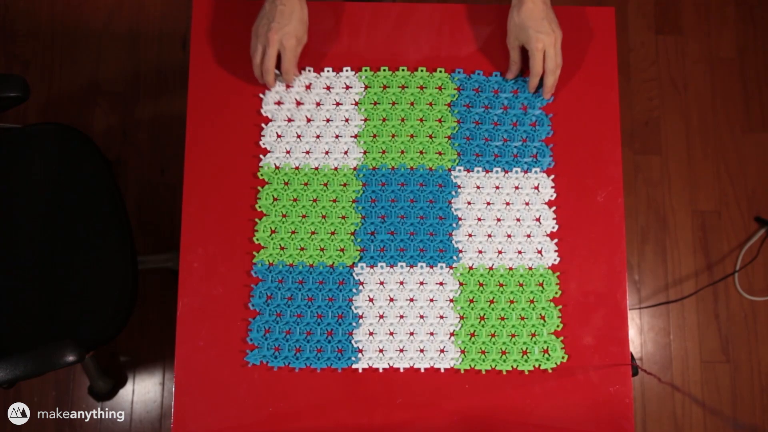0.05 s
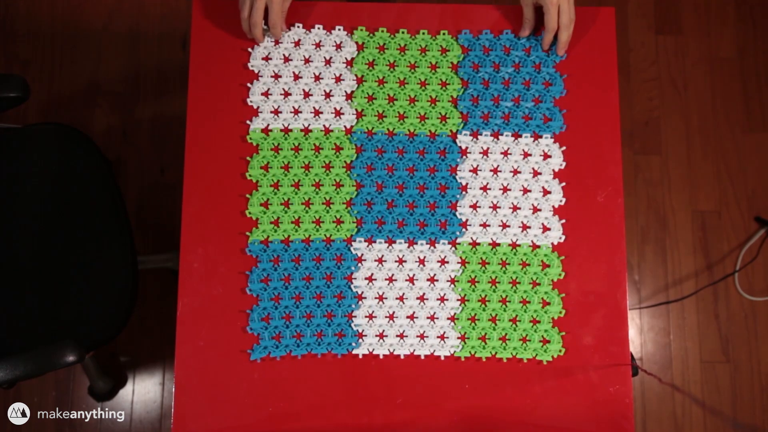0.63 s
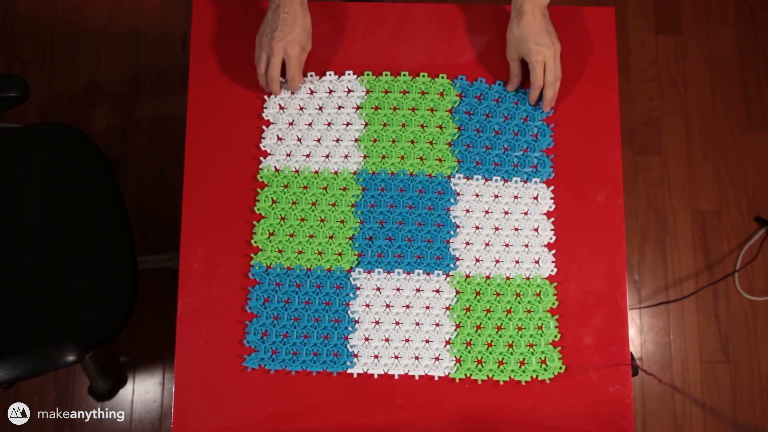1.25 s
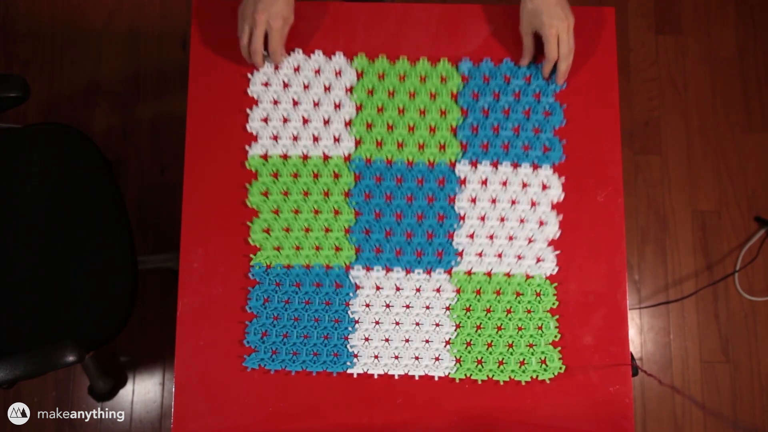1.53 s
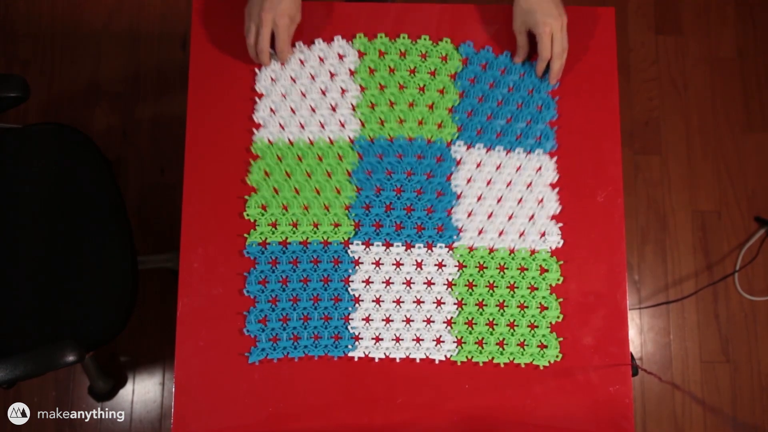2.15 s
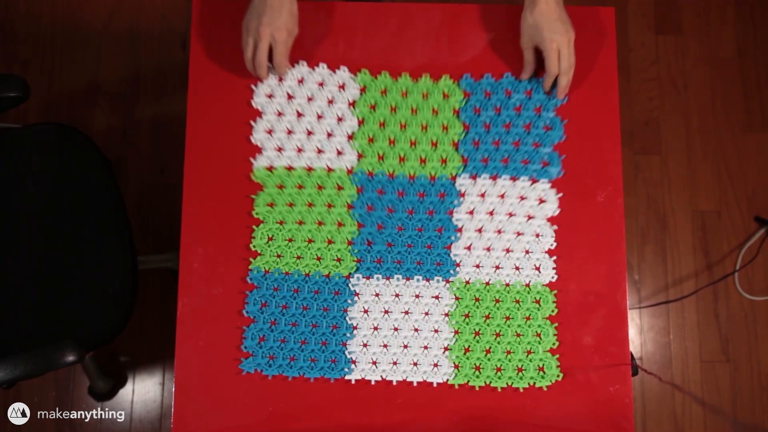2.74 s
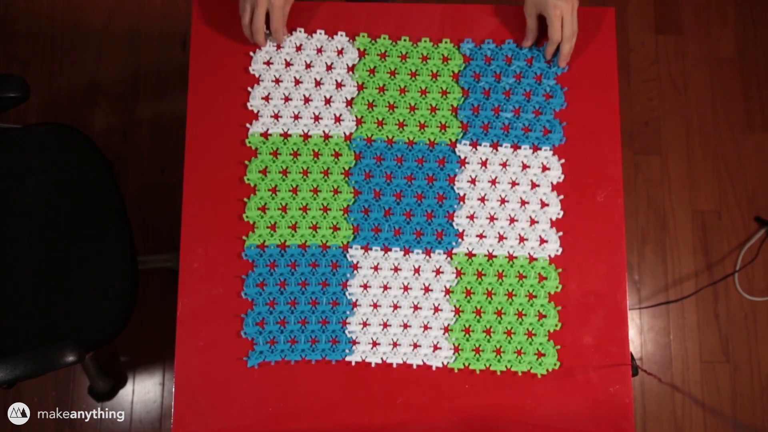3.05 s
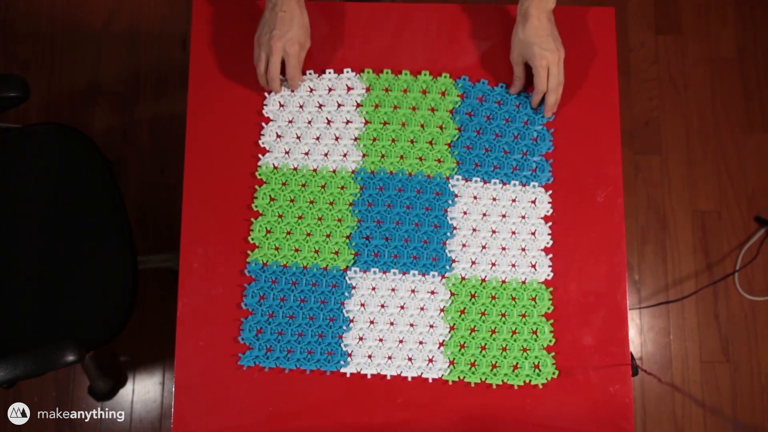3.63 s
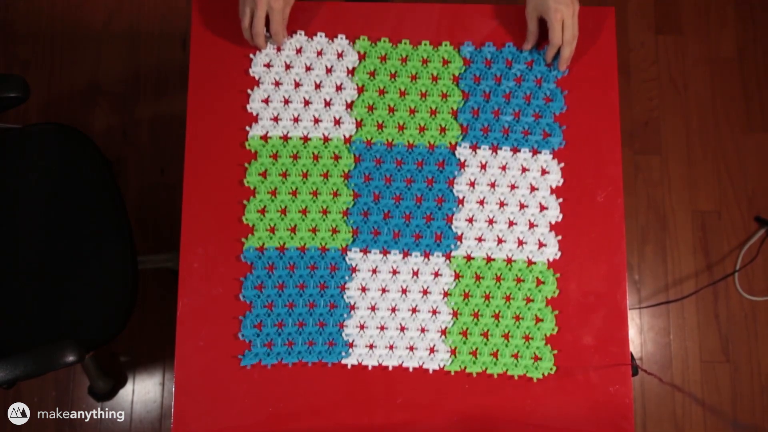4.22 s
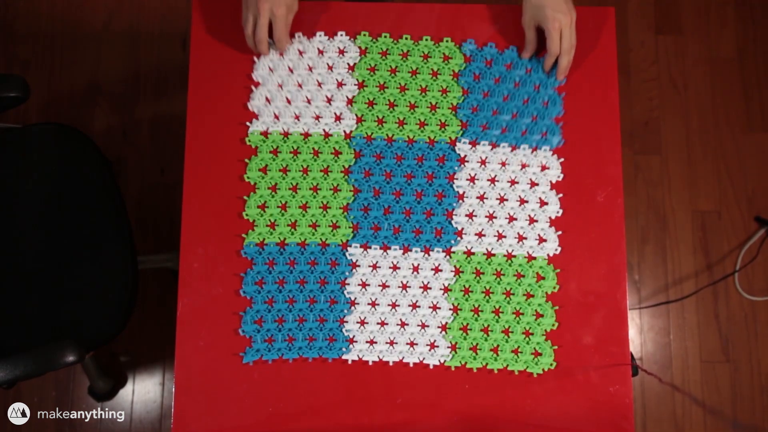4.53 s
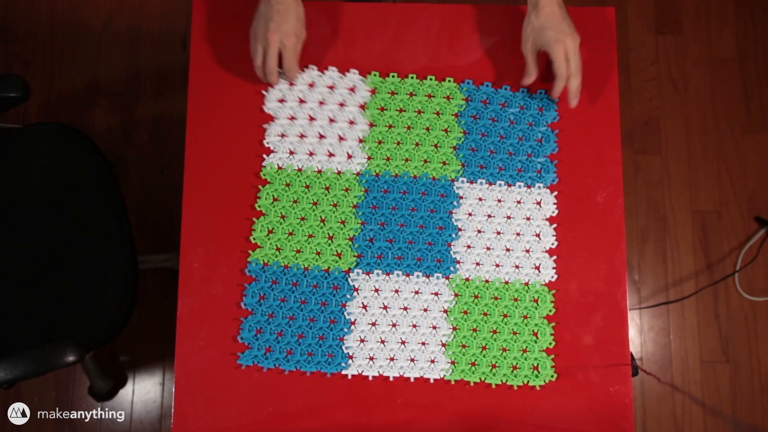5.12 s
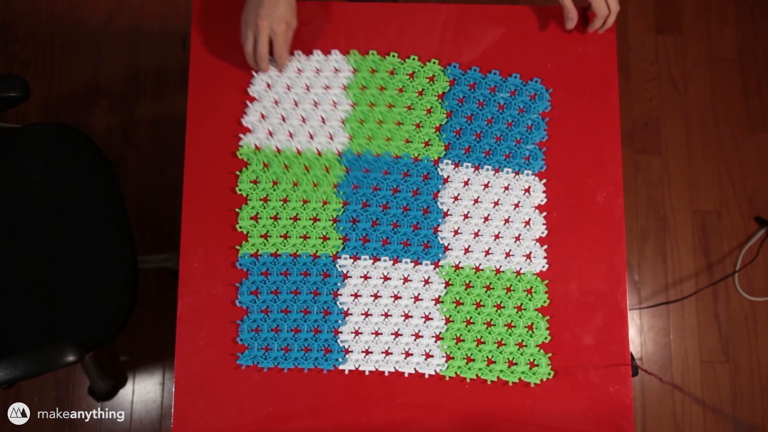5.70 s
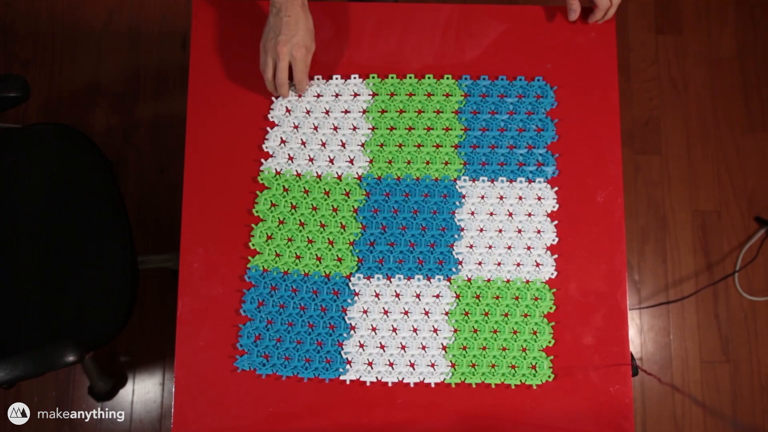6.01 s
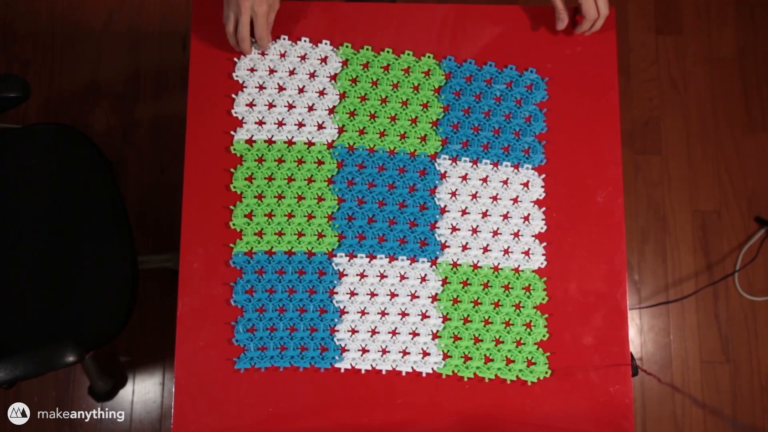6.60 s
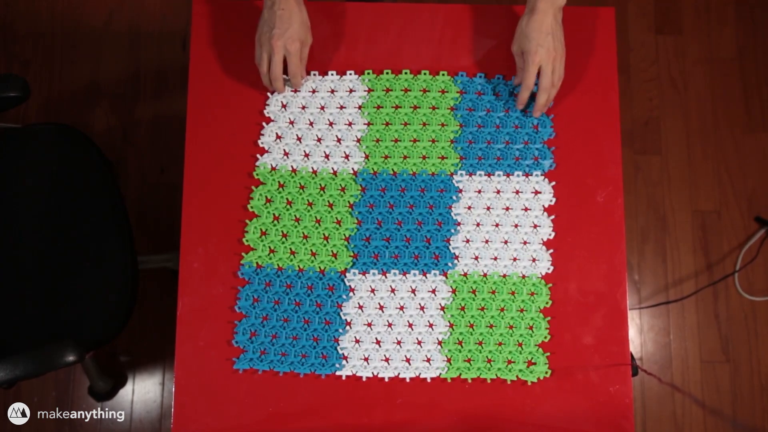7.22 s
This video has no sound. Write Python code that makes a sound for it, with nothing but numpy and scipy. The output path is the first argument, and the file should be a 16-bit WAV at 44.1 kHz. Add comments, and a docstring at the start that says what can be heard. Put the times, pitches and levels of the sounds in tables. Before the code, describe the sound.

Hands push and pull a sheet of small interlocking plastic links across a table. About a dozen short surges of dense, rustling clatter follow in a steady rhythm, nearly two a second. Most start with a light tug and a few bright snaps, then dull and die away while the tabletop drums faintly underneath. An occasional link tinkles. The sound is close, in a small, quiet room.

```python
"""A sheet of interlocking plastic links is pushed together and pulled apart by hand in a steady rhythm.
Each stroke starts with a tug and a few bright snaps at the near edge. Thousands of tiny impacts then
run through the sheet, duller and more diffuse towards its far end. They drive the resonances of the
table top, which drums underneath, while loose links ring briefly. A small, quiet room adds
early echoes, reverberation and a faint steady tone of air."""
import sys
import numpy as np
from scipy import signal
from scipy.fft import rfft, irfft
from scipy.io import wavfile
from scipy.ndimage import map_coordinates

SR = 44100
rng = np.random.default_rng(int(sys.argv[2]) if len(sys.argv) > 2 else 0)


def unload_audio(sound):
    """Save the sound as a 16-bit wav file, at the path given as the first command line argument."""
    columns = np.transpose(np.atleast_2d(sound))
    # keep every value between -1 and 1, then stretch to whole-number steps
    steps = np.round(np.clip(columns, -1, 1) * 32767)
    wavfile.write(sys.argv[1], SR, steps.astype(np.int16))


N = 328986

# room tone: (frequency [Hz], relative spectral density [dB])
AIR_SPECTRUM = [(30, -19), (60, -19), (130, -2.5), (600, -2), (2000, -10), (6000, -26), (15000, -29)]
# reverberation time: (frequency [Hz], time to fall 60 dB [s])
ROOM_DECAY = [(100, 0.39), (700, 0.68), (2000, 0.27), (6000, 0.41), (15000, 0.16)]
# stereo width: (frequency [Hz], side level [dB re mid])
STEREO_WIDTH = [(60, -20), (200, -21), (400, -20), (700, -15), (1300, -10), (2400, -5.5), (4400, -6),
                (8000, -3), (15000, -5)]
# resonances of table top and links: (frequency [Hz], bandwidth [Hz], gain [dB])
BODY_MODES = [(134, 35, 3.5), (209, 29, 5.5), (278.4, 9.1, 9), (308, 8.3, 5), (344, 10, 8.5),
              (424.4, 29.06, 7), (543, 20, 6.5), (614, 31, 2), (870, 43, 1.5), (1257, 65, 2), (1710, 21, 0),
              (1760, 75, 2), (4300, 170, 3), (12400, 260, -2)]
# single links tinkling: (time [s], frequency [Hz], peak level [dB])
TINKLE_EVENTS = [(2.012, 3180, -36), (2.024, 2616, -38), (2.05, 3150, -42), (3.212, 3187, -46),
                 (3.232, 3200, -45), (3.405, 4300, -32), (4.63, 4310, -23), (5.745, 12060, -31)]
# pitches of the links' brief ringing; the treble ones lie on peaks of the table's reflection:
# (frequency [Hz], level [dB re clatter])
RING_PITCHES = [(1300, -25), (1800, -14), (2550, -18), (3200, -26), (4300, -27), (5200, -21), (6000, -18),
                (8400, -38), (9530, -15), (10750, -20), (12030, -24), (14450, -33)]
# single links hitting their stops: (time [s], relative level [dB])
SNAP_EVENTS = [(0.0303, -40), (0.0617, -27.5), (0.8668, -25), (0.8919, -22.5), (1.3662, -33), (2.0067, -46),
               (2.0836, -32), (2.635, -31), (3.3009, -46), (3.3543, -36), (3.409, -28), (3.8624, -43),
               (3.89, -27), (4.3586, -41), (4.571, -34), (5.0485, -32), (5.0822, -26), (5.1075, -28.5),
               (5.1733, -26), (5.6176, -34.5), (5.6916, -27), (5.7989, -17), (6.1919, -35), (6.6679, -34),
               (6.7496, -33), (7.1646, -37), (7.3259, -35)]
# colour of a snap: (frequency [Hz], relative level [dB])
SNAP_SPECTRUM = [(100, -36), (500, 8.5), (2000, 9), (4500, 6), (8000, 5), (12000, 0), (13000, -20),
                 (15500, -22)]
# colour of the clatter: (frequency [Hz], relative spectral density [dB])
CLATTER_SPECTRUM = [(50, -58), (130, -14), (230, -12.5), (390, -9.5), (600, -2.5), (1100, -1), (1850, 2),
                    (2650, -1), (3600, -6.5), (4600, -5), (6000, -8), (7300, -16.5), (11900, -21),
                    (13000, -28.5), (15500, -32.5)]
# change of band level with each control:
# (frequency [Hz], drumming [dB/dB], brightness [dB/dB], clatter level [dB/dB])
SENSITIVITY = [(100, 0.88, -0.35, -0.28), (277, 1.03, -0.35, 0.061), (520, 0.46, 0.19, -0.16),
               (1080, 0.19, -0.15, -0.023), (1910, -0.17, 0.058, -0.063), (3440, -0.19, -0.14, 0.036),
               (5540, 0.11, 0.12, 0.26), (6960, -0.17, 0.64, 0.034), (8950, 0.42, 1.1, 0.19),
               (13000, -0.25, 1.17, 0.015)]
# the fingers take up slack in the nearest rows:
# (time [s], clatter level [dB], attack [dB/s], fade [dB/s], brightness [dB re clatter])
TUG_EVENTS = [(0.041, -27.5, 1100, 44.0, -27), (0.771, -45.5, 450, 45.0, -25), (1.372, -24, 1100, 61, -19),
              (2.001, -37.5, 550, 29.0, -27), (2.639, -25.5, 800, 25, -17.5), (3.3, -39, 550, 36.0, -18.5),
              (3.871, -29, 1000, 0.0, -21), (4.481, -40.5, 450, 38, -21), (5.05, -33.5, 700, 51.0, -22),
              (5.088, -26.5, 800, 45.0, -16.4), (5.619, -33.0, 1100, 70.0, -24),
              (6.145, -30.5, 600, 20.0, -23), (6.671, -32, 600, 104.0, -22),
              (7.167, -30.5, 700, 68.0, -22.7), (7.331, -31, 700, 35.0, -16.5)]
# the whole sheet slides: (time of full speed [s], clatter level [dB], last 10 dB of rise [s], hold [s],
# fall [dB/s], drumming [dB re clatter], brightness [dB re clatter])
STROKE_EVENTS = [(0.239, -17.45, 0.12, 0.144, 123.0, -19.5, -15.5),
                 (0.962, -15.55, 0.086, 0.102, 105.0, -21, -15.5),
                 (1.524, -16.75, 0.074, 0.177, 124.0, -19, -15),
                 (2.241, -16.15, 0.11, 0.111, 116.0, -19, -15.5),
                 (2.783, -16.55, 0.066, 0.188, 110.0, -19.5, -15),
                 (3.499, -15.35, 0.088, 0.088, 107.0, -19.5, -15),
                 (4.024, -17.05, 0.068, 0.183, 117.0, -19.5, -14.5),
                 (4.705, -16.35, 0.12, 0.109, 131.0, -18, -16),
                 (5.236, -16.95, 0.062, 0.153, 131.0, -19.0, -15.5),
                 (5.767, -16.35, 0.066, 0.166, 138.0, -20.7, -14),
                 (6.26, -15.35, 0.054, 0.201, 147.0, -22.1, -12.5),
                 (6.86, -16.25, 0.085, 0.158, 125, -21.7, -14),
                 (7.507, -18.75, 0.087, 0.155, 114.0, -13, -15.5)]

# bands in which an impact rings, narrow in the bass and wider in the treble
EDGES_HZ = np.geomspace(30 + 500, 16200 + 500, 41) - 500
CENTRES_HZ = (EDGES_HZ[:-1] + EDGES_HZ[1:]) / 2
# control values that leave the clatter's colour unchanged
USUAL_LEVEL_DB, USUAL_DRUMMING_DB, USUAL_BRIGHTNESS_DB = -22.5, -16.5, -15.5


def from_db(db):
    """Amplitude grows tenfold for every 20 dB."""
    return np.exp(np.asarray(db) * np.log(10) / 20)


def at_hz(table, hz, column=1):
    """Interpolation of a table on a logarithmic frequency axis."""
    table = np.array(table)
    return np.interp(np.log(hz), np.log(table[:, 0]), table[:, column])


def per_band(table, column=1):
    """A spectrum sampled at the band centres, as a column."""
    return at_hz(table, CENTRES_HZ, column)[:, None]


def air(level_db=-57.5, side_db=-1.5):
    """Stationary coloured noise makes the faint room tone; returns mid and side."""
    hz = np.maximum(np.fft.rfftfreq(N, 1 / SR), 1)
    white = rng.standard_normal((2, N))
    noise = irfft(rfft(white) * from_db(at_hz(AIR_SPECTRUM, hz)), N)
    return noise / noise.std() * from_db([[level_db], [level_db + side_db]])


def reverberation(clicks, t60, scatter, wet_db=-6.5):
    """A diffuse field stores the energy of the clicks and loses it exponentially."""
    retained = from_db(-120 / (t60 * SR))   # share of energy left after one sample
    energy = signal.lfilter([0, 1 - retained], [1, -retained], clicks ** 2 + 1e-18)
    return from_db(wet_db) * np.sqrt(energy) * scatter


def early_echoes(x, echo_db=-22.0, first_s=.003, last_s=.024, count=10):
    """Reflection from walls and furniture adds weak delayed copies, different in mid and side."""
    out = x.copy()
    delays = (rng.uniform(first_s, last_s, (2, count)) * SR).astype(int)
    for channel, lags in enumerate(delays):
        for lag in lags:
            out[channel, lag:] += from_db(echo_db) * rng.choice([-1, 1]) * x[channel, :-lag]
    return out


def near_reflection(x, brightness_db, delay_s=.00166, strength=0.37, above_hz=4000):
    """Comb filtering: treble of the near links returns off a hard surface to interfere with itself."""
    far_db, near_db = -30, -12   # brightness of far and of near links
    nearness = np.clip((brightness_db - far_db) / (near_db - far_db), 0, 1)
    treble = signal.sosfiltfilt(signal.butter(1, above_hz, "high", fs=SR, output="sos"), x)
    return strength * nearness * map_coordinates(treble, [np.arange(N) - delay_s * SR], order=3)


def body_resonance(x):
    """Forced vibration: the table top and links colour the sound near their natural frequencies."""
    for hz, width_hz, peak_db in BODY_MODES:
        mode = signal.lfilter(*signal.iirpeak(hz, hz / width_hz, fs=SR), x)
        x = x + (from_db(peak_db) - 1) * mode
    return x


def ring_out(*impacts):
    """Impulse response: each impact rings briefly in every band and in the room; returns mid and side."""
    scatter = rng.standard_normal((2, 2, N))   # neighbouring bands scatter independently
    out = np.zeros((2, N))
    for k, t60 in enumerate(at_hz(ROOM_DECAY, CENTRES_HZ)):
        clicks = np.zeros((2, N))
        for onsets, strengths in impacts:   # samples; strengths by (mid/side, band, impact)
            clicks[:, onsets] += strengths[:, k]
        band = signal.butter(2, EDGES_HZ[k:k + 2], "band", fs=SR, output="sos")
        out += signal.sosfilt(band, clicks + reverberation(clicks, t60, scatter[k % 2]))
    return out


def tinkles(t60=0.1):
    """Damped free vibration: a link nudged clear of its neighbours rings at a single pitch."""
    t = np.arange(SR // 8) / SR
    out = np.zeros(N)
    for start_s, hz, peak_db in TINKLE_EVENTS:
        i = int(start_s * SR)
        out[i:i + len(t)] += np.sin(2 * np.pi * hz * t) * from_db(peak_db - 60 * t / t60)
    return out


def loose_links(level_db, brightness_db, t60=0.031, detune=0.04, lowest_hz=600, count=260):
    """Exponential decay: lifted links ring briefly at scattered pitches; returns mid and side."""
    t = np.arange(SR // 12) / SR
    out = np.zeros((2, N + len(t)))
    for hz, ring_db in RING_PITCHES:
        onsets = rng.integers(0, N, count)
        pitch, size, place = rng.standard_normal((count, 3)).T
        near_db = at_hz(SENSITIVITY, hz, column=2) * (brightness_db[onsets] - USUAL_BRIGHTNESS_DB)
        size = size * from_db(level_db[onsets] + ring_db + near_db)
        rings = np.sin(2 * np.pi * np.outer(hz * np.exp(detune * pitch), t)) * from_db(-60 * t / t60)
        sides = place * from_db(at_hz(STEREO_WIDTH, hz))
        for i, ring, side in zip(onsets, size[:, None] * rings, sides):
            out[:, i:i + len(t)] += ring, side * ring
    # the links' ringing stays clear of the bass
    return signal.sosfilt(signal.butter(2, lowest_hz, "high", fs=SR, output="sos"), out[:, :N] + 1e-18)


def snaps(gain_db=11.5, bounce_s=0.0028, bounce_db=-1.0, side_db=-17.0, count=5):
    """Inelastic rebound: a link chatters on its stop in weakening bounces; returns onsets, strengths."""
    start_s, level_db = np.transpose(SNAP_EVENTS)
    gaps_s = bounce_s * rng.uniform(0.21, 2.3, (len(start_s), count))
    times_s = start_s[:, None] + np.cumsum(gaps_s, axis=1) - gaps_s[:, :1]
    onsets = (times_s * SR).astype(int).ravel()
    impact_db = level_db[:, None] + gain_db + bounce_db * np.arange(count)
    mid = from_db(impact_db.ravel() + per_band(SNAP_SPECTRUM))
    scatter = rng.standard_normal((len(onsets), len(CENTRES_HZ), 2)).T
    return onsets, np.array([mid, mid * from_db(side_db)]) * scatter


def tug(t, peak_db, attack_db_per_s, fade_db_per_s, brightness_db, rattle_s=.14, drumming_db=-21.5):
    """Transient excitation: the near rows clack and rattle; returns clatter, drumming, treble in dB."""
    release_db = 200 * np.maximum(t - rattle_s, 0)
    level_db = peak_db + np.minimum(attack_db_per_s * t, -fade_db_per_s * t) - release_db
    return np.array([level_db, level_db + drumming_db, level_db + brightness_db])


def stroke(t, peak_db, rise_s, hold_s, fall_db_per_s, drumming_db, brightness_db):
    """Propagation: motion runs through the sliding sheet; returns clatter, drumming, treble in dB."""
    rise_curve, sag_db_per_s = 1.85, 23
    near_s, travel_s, far_dulling_db, drumming_db_per_s = 0.018, 0.15, 5.5, 24
    rise_db = 10 * (np.maximum(-t, 0) / rise_s) ** rise_curve   # t counts from full speed
    sag_db = sag_db_per_s * np.clip(t, 0, hold_s)
    fall_db = fall_db_per_s * np.maximum(t - hold_s, 0)
    level_db = peak_db - rise_db - sag_db - fall_db
    # away from the hands the sound dulls and leaves more of the table's drumming
    table_db = drumming_db + drumming_db_per_s * t
    treble_db = brightness_db - far_dulling_db * np.clip(t, -near_s, travel_s) / travel_s
    return np.array([level_db, level_db + table_db, level_db + treble_db])


def handling(step=32):
    """Incoherent sources add in power; returns clatter [dB], drumming and brightness [dB re clatter]."""
    t = np.arange(0, N + step, step) / SR
    moves = [stroke(t - time_s, *row) for time_s, *row in STROKE_EVENTS]
    moves += [tug(t - time_s, *row) for time_s, *row in TUG_EVENTS]
    rest_db = [[-66], [-63], [-85]]   # clatter, drumming, treble: the sheet never lies quite still
    power = from_db(rest_db) ** 2 + sum(from_db(move) ** 2 for move in moves)
    level_db, table_db, treble_db = [np.interp(np.arange(N) / SR, t, 10 * np.log10(p)) for p in power]
    return level_db, table_db - level_db, treble_db - level_db


def clatter(level_db, drumming_db, brightness_db, peak_per_s=9000, crowding=.35, gain_db=6.5):
    """Shot noise: links collide at random, each with its own colour; returns onsets, strengths."""
    size_spread_db, hardness_spread_db, widening = 2.0, 1.5, 0.83
    # a harder pull sets more links moving as well as hitting harder
    per_s = peak_per_s * from_db(crowding * (level_db - level_db.max()))
    onsets = np.flatnonzero(rng.random(N) < per_s / SR)
    size = from_db(size_spread_db * rng.standard_normal(len(onsets)))
    size *= from_db(level_db[onsets] + gain_db) * np.sqrt(SR / per_s[onsets] / np.mean(size ** 2))
    table_db = per_band(SENSITIVITY) * (drumming_db[onsets] - USUAL_DRUMMING_DB)
    # corner-on-corner contacts tick more brightly than flat ones
    contact_db = brightness_db[onsets] + hardness_spread_db * rng.standard_normal(len(onsets))
    near_db = per_band(SENSITIVITY, column=2) * (contact_db - USUAL_BRIGHTNESS_DB)
    force_db = per_band(SENSITIVITY, column=3) * (level_db[onsets] - USUAL_LEVEL_DB)
    mid = size * from_db(per_band(CLATTER_SPECTRUM) + table_db + near_db + force_db)
    # far links are duller and their treble arrives from all sides
    side = mid * from_db(np.minimum(per_band(STEREO_WIDTH) - widening * near_db, 0))
    scatter = rng.standard_normal((len(onsets), len(CENTRES_HZ), 2)).T
    return onsets, np.array([mid, side]) * scatter


def scene(balance_db=-0.34):
    """Superposition of sheet, table and room, a little to the right; returns left and right."""
    level_db, drumming_db, brightness_db = handling()
    ringing = loose_links(level_db, brightness_db)
    impacts = ring_out(snaps(), clatter(level_db, drumming_db, brightness_db))
    mid, side = early_echoes(body_resonance(impacts) + ringing) + air()
    mid = mid + near_reflection(mid, brightness_db) + tinkles()
    return np.array([mid + side, mid - side]) * from_db([[balance_db], [-balance_db]])


def record(dry, cutoff_hz=15850):
    """Band limiting: a steep low-pass filter removes the highest treble."""
    return signal.sosfilt(signal.ellip(12, .1, 90, cutoff_hz, fs=SR, output="sos"), dry)


dry = scene()
out = record(dry)
unload_audio(out)
```